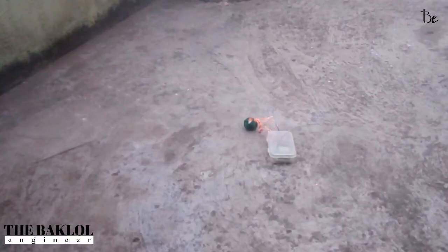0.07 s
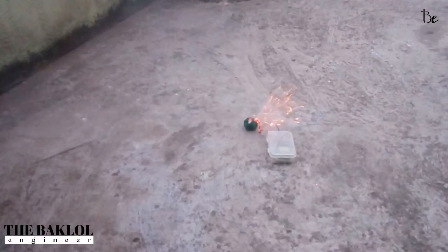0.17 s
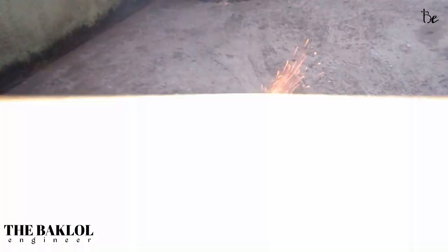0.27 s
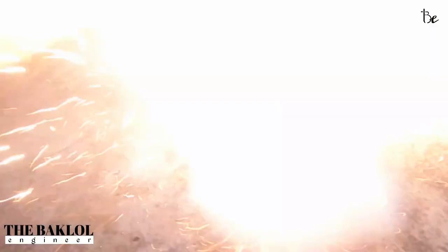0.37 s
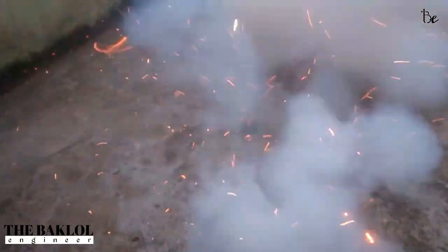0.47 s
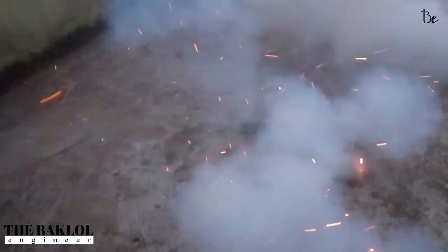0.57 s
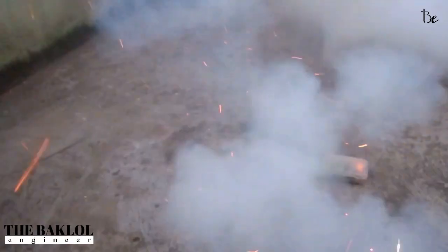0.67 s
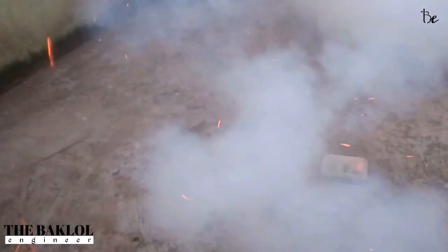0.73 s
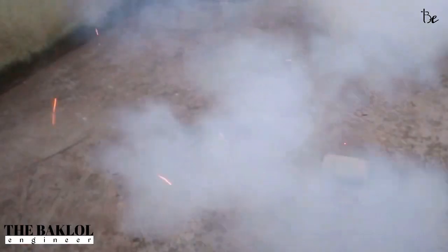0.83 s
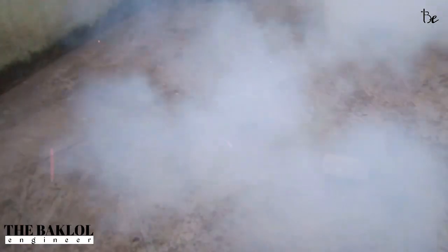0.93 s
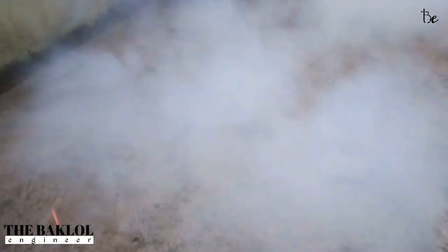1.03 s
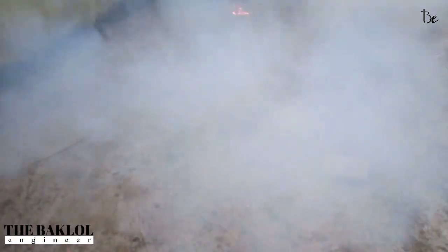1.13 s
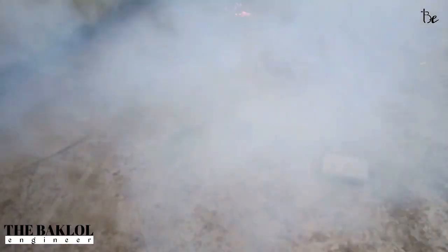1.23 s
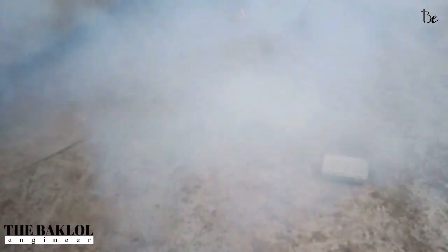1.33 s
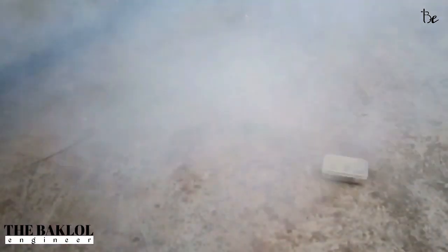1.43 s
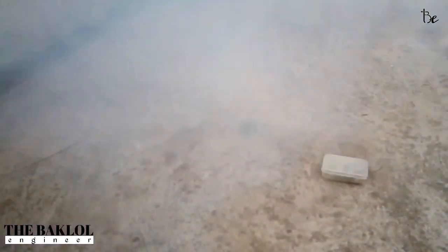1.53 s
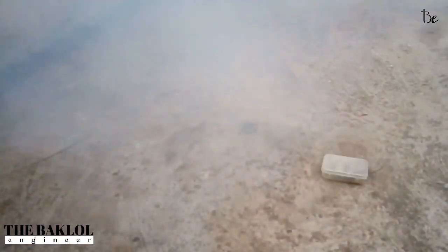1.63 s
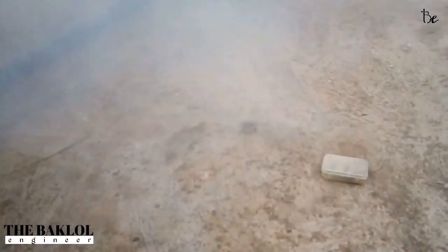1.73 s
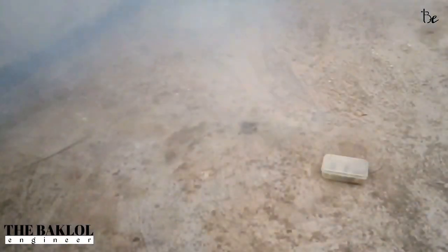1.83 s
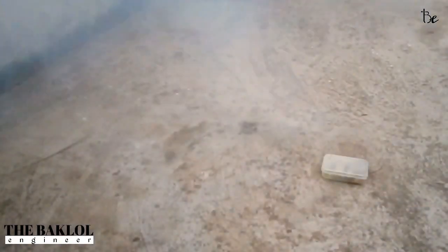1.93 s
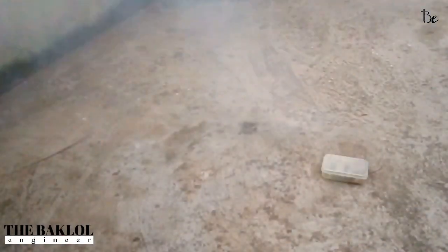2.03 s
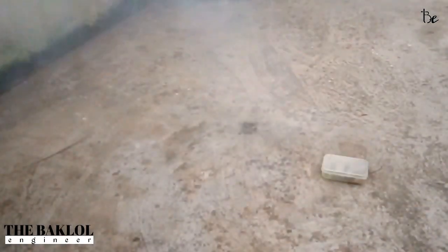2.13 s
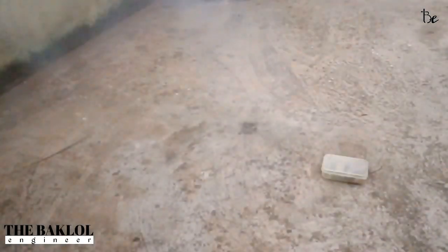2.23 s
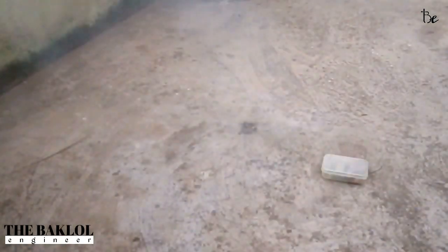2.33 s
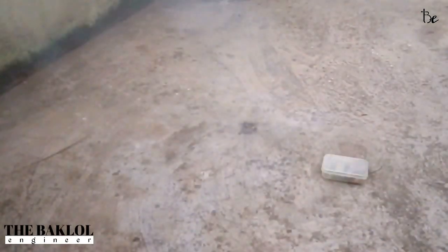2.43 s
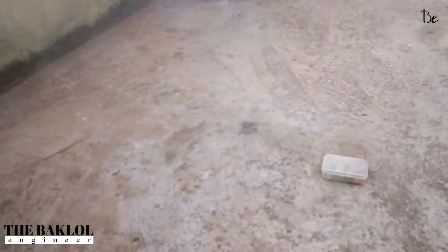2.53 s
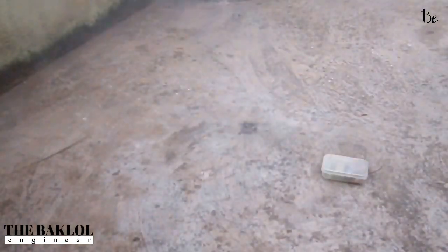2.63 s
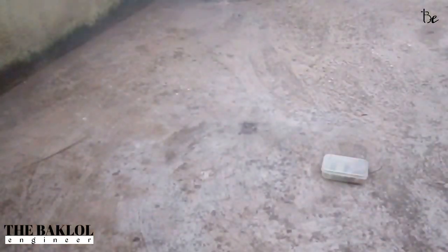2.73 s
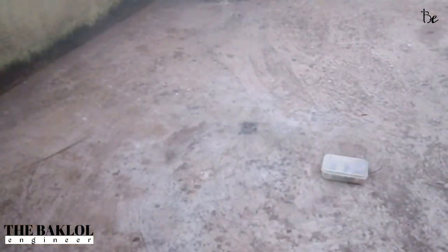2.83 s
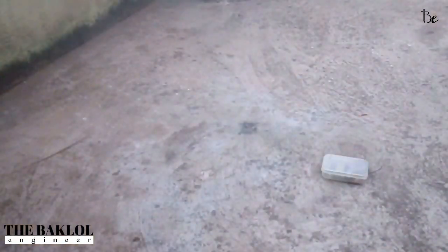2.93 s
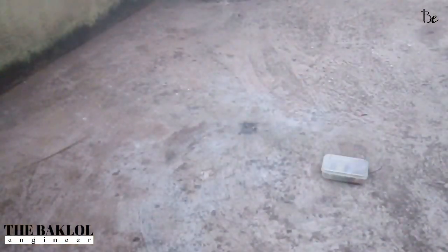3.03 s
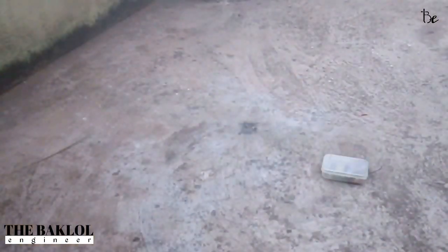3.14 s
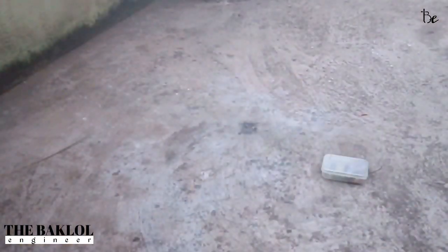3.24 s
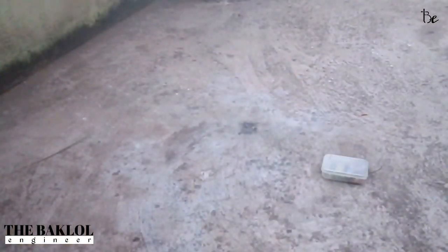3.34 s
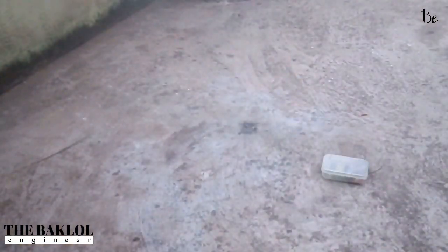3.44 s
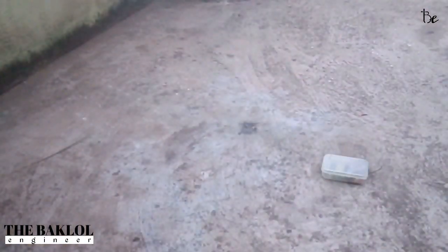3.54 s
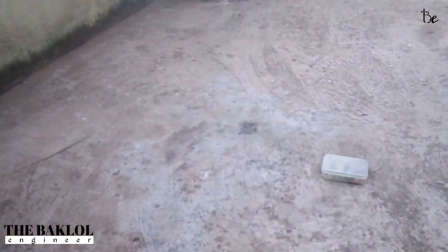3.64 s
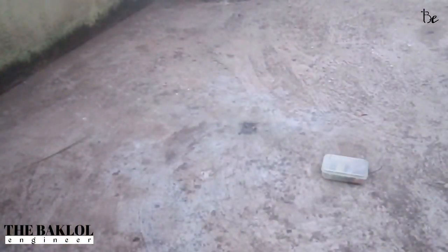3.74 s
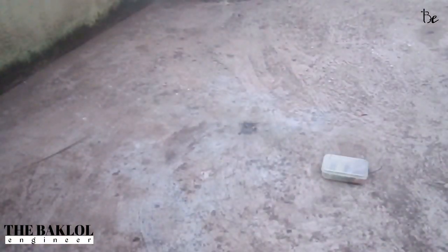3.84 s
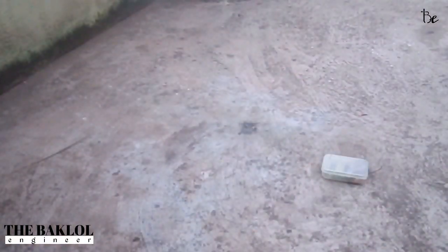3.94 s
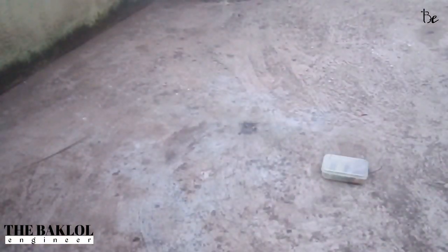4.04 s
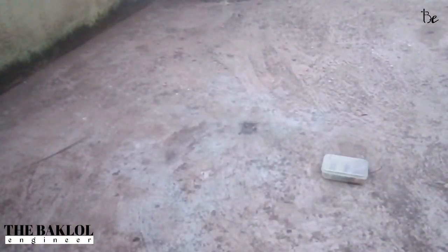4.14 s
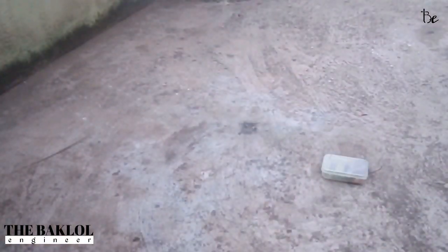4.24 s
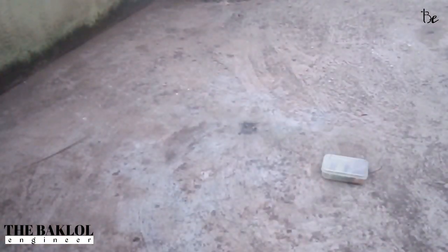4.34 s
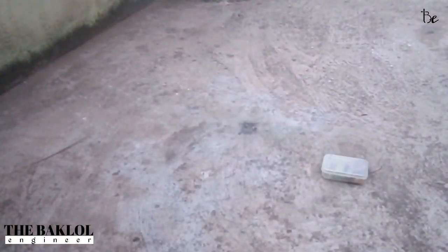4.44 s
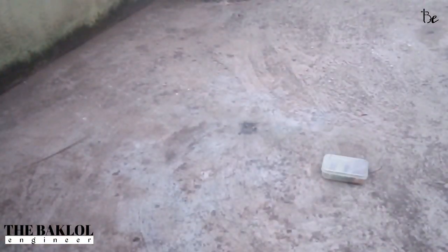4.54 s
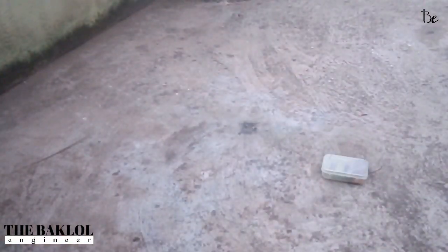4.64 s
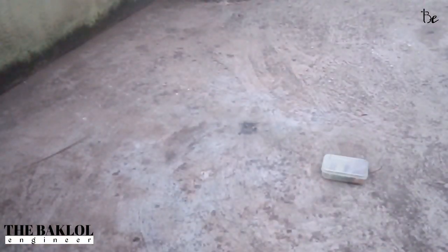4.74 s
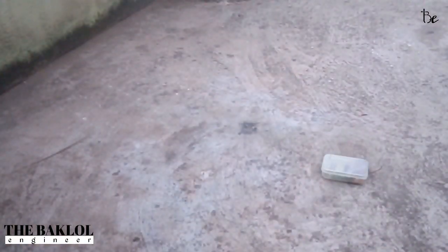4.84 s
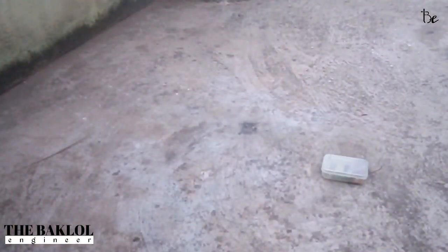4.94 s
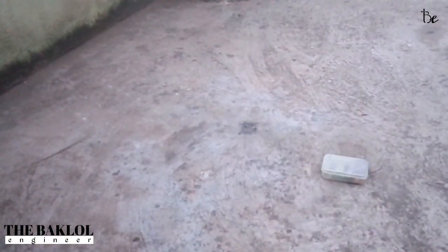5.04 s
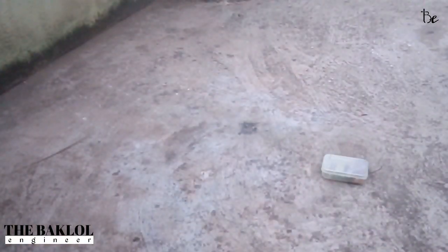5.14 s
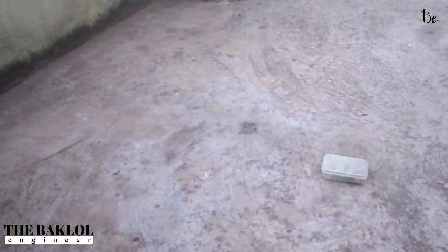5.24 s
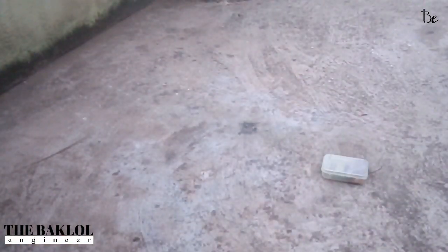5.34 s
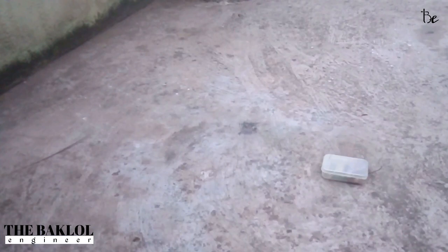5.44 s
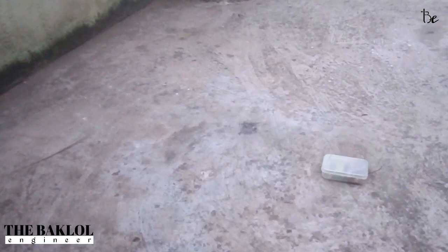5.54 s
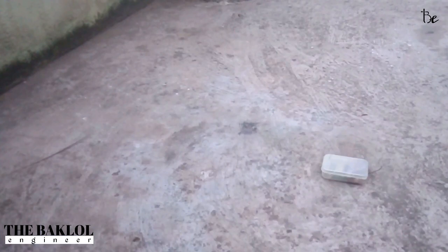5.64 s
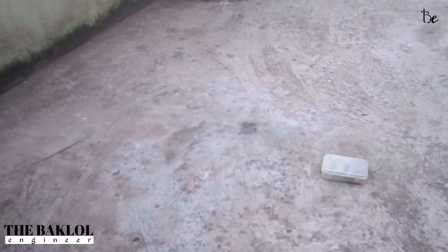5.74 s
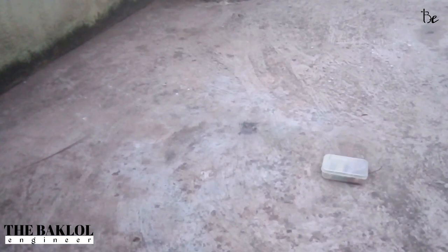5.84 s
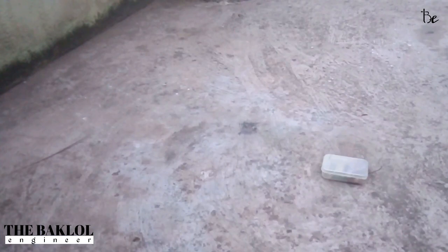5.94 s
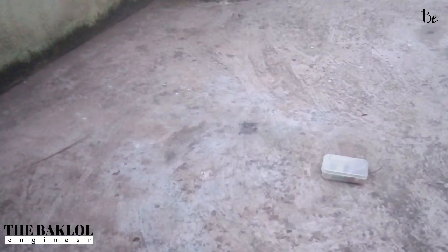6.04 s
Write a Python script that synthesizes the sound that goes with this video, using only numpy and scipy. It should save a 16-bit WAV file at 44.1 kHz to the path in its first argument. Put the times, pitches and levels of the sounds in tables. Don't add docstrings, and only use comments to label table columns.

```python
import sys
import numpy as np
from scipy import signal
from scipy.fft import rfft, irfft, next_fast_len
from scipy.io import wavfile
from scipy.ndimage import uniform_filter1d

SR = 44100
rng = np.random.default_rng(int(sys.argv[2]) if len(sys.argv) > 2 else 0)


def persist_wave(psi):
    counts = np.round(np.clip(psi, -1, 1) * 32767).astype(np.int16)
    wavfile.write(sys.argv[1], SR, np.atleast_2d(counts).T)


def invert_db(x):
    u = np.asarray(x, float) / 20
    return 10 ** u


N = 268745
t = np.arange(N) / SR
BANG_S = .3256


def noise():
    return rng.standard_normal(N)


def unit(x):
    return x / np.sqrt(np.mean(x ** 2))


def shaped(x, gain):
    n = next_fast_len(len(x))
    hz = np.maximum(np.arange(n // 2 + 1) * SR / n, 1.)
    return irfft(rfft(x, n) * gain(hz), n)[:len(x)]


def coloured(points):
    hz, db = np.transpose(points)
    return unit(shaped(noise(), lambda f: invert_db(np.interp(np.log(f), np.log(hz), db))))


def ring(x, hz, width):
    return signal.lfilter(*signal.iirpeak(hz, hz / width, fs=SR), x)


def ring_twice(x, hz, width):
    return ring(ring(x, hz, width), hz, width)


def walk(rate):
    k = int(SR / rate)
    held = np.repeat(rng.standard_normal(N // k + 1), k)
    return unit(uniform_filter1d(uniform_filter1d(held, k), k)[:N])


def curve(rows):
    return np.interp(t, *np.transpose(rows))


def swell(s, length):
    return np.maximum(np.sin(np.pi * np.clip((t - s) / length, 0, 1) ** 0.74), 0) ** 0.55


def soft_clip(x, top, power):
    return x / (1 + np.abs(x / top) ** power) ** (1 / power)


TAIL_HZ = (80, 280, 950, 3600)
# pitch_hz, level_db, hold_s, fade_db_per_s
NEAR = [(80, -20.5, .5, 40), (280, -8, 0.39, 43.5), (950, -4.5, 0.16, 36), (3600, -9.5, 0.19, 46.5)]
# pitch_hz, level_db, fade_db_per_s
DISTANT = [(80, -56.5, 4.5), (280, -41, 11.5), (950, -43.5, 11.5), (3600, -74, -3.5)]
# centre_s, spread_s, level_db, pitch_hz
CLUSTERS = [(.355, 0.03, -6.5, 5300), (.42, .06, -9.5, 3600), (.39, 0.028, -11, 576),
            (0.451, 0.023, -2.5, 85.4), (0.439, 0.034, -2.5, 900), (0.518, 0.023, -4.5, 255),
            (.56, 0.0074, -11, 867.6), (.69, 0.03, -9, 302), (.63, 0.015, -21, 1230), (.82, 0.06, -15, 300),
            (.9, 0.047, -23, 72.3), (0.979, 0.013, -17.5, 280), (1.1, 0.012, -25, 700),
            (1.091, 0.01, -31.5, 3500), (1.33, 0.059, -30.5, 302), (1.481, 0.026, -29, 381),
            (1.74, .03, -52, 222), (1.92, 0.047, -39.5, 347), (2.03, 0.074, -41, 379),
            (2.21, 0.039, -41, 300), (2.43, 0.1, -45, 231)]


def tail_db(hz):
    distant_s, rise_s, knee_s = 1.674, 0.66, 0.14
    bass_lag_s, bass_lag_db, cluster_octaves = 0.03, -12.5, 0.56

    def at(rows, column):
        return np.interp(np.log(hz), np.log(TAIL_HZ), np.array(rows)[:, column])

    ms = t[::44]
    age = np.maximum(ms - BANG_S, 0)
    late = knee_s * np.logaddexp(0, (age - at(NEAR, 2)) / knee_s)
    lag_db = bass_lag_db * np.exp(-age / bass_lag_s) / (1 + (hz / 1500) ** 2)
    power = invert_db(2 * (at(NEAR, 1) - at(NEAR, 3) * late + lag_db))
    arrival = np.clip(1 + (ms - distant_s) / rise_s, 0, 1) ** 2
    power += invert_db(2 * (at(DISTANT, 1) - at(DISTANT, 2) * (ms - distant_s))) * arrival
    for s, spread, db, centre in CLUSTERS:
        octaves = np.log2(hz / centre)
        power += invert_db(2 * db) * np.exp(-((ms - s) / spread) ** 2 - (octaves / cluster_octaves) ** 2)
    return np.interp(t, ms, 10 * np.log10(power + 1e-14))


# pitch_hz, level_db
YARD_COLOUR = [(30, 4), (50, -1.5), (65, 1.5), (80, -4.5), (140, 2), (280, 2.4), (400, 2), (560, -0.5),
               (800, -1.25), (1900, 1.5), (2800, 0.4), (4500, 1), (7000, 0)]
# pitch_hz, width_hz, level_db against the tail
YARD = [(94, 9.7, -13.5), (228, 12, -11), (265, 15, -6.5), (311, 37, -10.5), (149, 8, -23.5),
        (554.5, 6, -17.5), (888, 20, -22.5), (1360, 22, -21.5), (7330, 30, -39.5), (207.5, 8, -16.5),
        (413.4, 21, -12.5), (672, 10, -21), (738, 12, -21), (65, 10, -19)]


def blast():
    excess_db, excess_s = 9.5, 0.14
    since = np.maximum(t - BANG_S, 0)
    colour_hz, colour_db = np.transpose(YARD_COLOUR)
    out, flutter = np.zeros(N), walk(25)
    for hz in 28 * 2 ** np.arange(0, 8.1, 1 / 3):
        db = tail_db(hz) - 6.2 * max(np.log2(60 / hz), 0) - 22 * since * max(np.log2(hz / 3600), 0)
        db = db + np.interp(np.log(hz), np.log(colour_hz), colour_db)
        band = shaped(noise(), lambda f: np.exp(-(np.log2(f / hz) * 3.0) ** 2) / (1 + (f / 6600) ** 16))
        out += unit(band) * invert_db(db - 10.0 + 1.2 * flutter + 1.8 * walk(11))
    hum = sum(unit(ring(noise(), hz, width)) * invert_db(db) for hz, width, db in YARD)
    hum = shaped(hum, lambda f: 1 / (1 + (f / 7700) ** 30))
    out += hum * invert_db(tail_db(TAIL_HZ[1])) * np.clip(since / 0.12, 0, 1)
    out *= invert_db(excess_db * np.exp(-since / excess_s)) * np.minimum(since / 0.005, 1) ** 2
    front = 9 * np.sin(2 * np.pi * (400 + 16000 * since) * since)
    return out - front * np.minimum(since / 0.0012, 1) ** 3 * np.exp(-since / 0.0032)


# start_s, peak_db, pitch_hz, length_s
SLAPS = [
    (.879, -11, 400, .012),
    (1.082, -17, 700, .012),
    (1.324, -25, 400, .012),
    (1.457, -17.5, 340, .016),
    (1.712, -27, 200, .02),
]


def slaps():
    out = np.zeros(N)
    u = t[:4096]
    for s, db, hz, length in SLAPS:
        burst = ring_twice(rng.standard_normal(len(u)), hz, 1.1 * hz)
        burst = burst * np.exp(-u / length) * np.minimum(u / 0.009, 1) ** 2
        start = int(s * SR)
        out[start:start + len(u)] += burst / np.abs(burst).max() * invert_db(db)
    return shaped(out, lambda f: 1 / (1 + (f / 1600) ** 4))


GATE_HZ = (178.7, 464, 296.6)
GATE_RISE_S = (.035, 0.044, .035)
# start_s, level_db
GATE_PUSHES = [
    [(.46, -22), (.61, -8.5), (.82, -11.5), (1.07, -24), (1.31, -35), (1.45, -42.5), (1.7, -34),
     (1.85, -34), (2.15, -46.5), (2.4, -38)],
    [(.46, -24), (.65, -30.5), (.76, -18.5), (.86, -25.5), (1.03, -25.5), (1.12, -29.5), (1.22, -34.5),
     (1.39, -31), (1.53, -37.5), (1.72, -49), (1.87, -39.5), (2.15, -55), (2.3, -53.5), (2.58, -54),
     (2.76, -57)],
    [(.54, -11.5), (.6, -15), (.66, -10.5), (.73, -18.5), (.81, -18), (.96, -27), (1.23, -30), (1.31, -34),
     (1.9, -41), (2.2, -44.5)],
]


def gate():
    out = 0
    for hz, rise, pushes in zip(GATE_HZ, GATE_RISE_S, GATE_PUSHES):
        tone = np.sin(2 * np.pi * np.cumsum(hz * (1 + .004 * walk(6.4))) / SR)
        ages = [(np.maximum(t - s, 0) / rise, db) for s, db in pushes]
        level = np.sqrt(sum((invert_db(db) * u * np.exp(1 - u)) ** 2 for u, db in ages))
        out = out + np.sqrt(2) * tone * level * invert_db(-2 + 2.0 * walk(25))
    return out


# pitch_hz, start_s, rise_s, level_db
RAILING = [(565, .88, .1, -32), (565, 1.12, .07, -38), (931, .76, .07, -33), (1170, .8, .07, -33),
           (1410, .78, .06, -29), (1410, .95, .07, -38), (2036, .7, .05, -30), (1790, .72, .06, -31),
           (462, 1.8, .1, -52), (462, 2.2, .1, -52), (255, 2.3, .12, -47)]


def railing():
    out = 0
    for hz, s, rise, db in RAILING:
        u = np.maximum(t - s, 0) / rise
        out = out + invert_db(db) * u * np.exp(1 - u) * unit(ring_twice(noise(), hz, 18))
    return out


# start_s, level_db
FUSE = [
    (0, -68.5),
    (.06, -62.5),
    (.12, -54),
    (.17, -47),
    (.22, -44.5),
    (.3, -41.5),
]
# pitch_hz, level_db per Hz
FUSE_COLOUR = [(150, -35), (300, -5.5), (900, -5.5), (3000, -2), (6500, -2.5), (8000, 0.5), (12000, -5.5),
               (15500, -12)]


def fuse():
    dull_db_per_s, flare_s = 200, .185
    hiss = coloured(FUSE_COLOUR)
    top = shaped(hiss, lambda f: 1 / (1 + (7000 / f) ** 12))
    hiss = hiss + top * (invert_db(-dull_db_per_s * np.maximum(flare_s - t, 0)) - 1)
    level_db = np.where(t <= BANG_S, curve(FUSE), -140)
    return hiss * invert_db(level_db + 5.0 + .7 * walk(150))


# start_s, length_s, level_db
FIZZ = [
    (.44, .3, -35),
    (.72, 0.21, -45),
    (1.089, 0.064, -53),
    (1.265, .07, -64),
]
# pitch_hz, level_db per Hz
FIZZ_COLOUR = [(6000, -29.5), (7600, 0), (9000, -1), (10500, -9), (15000, -16.5)]


def fizz():
    level = sum(invert_db(db) * swell(s, length) ** 2 for s, length, db in FIZZ)
    return coloured(FIZZ_COLOUR) * invert_db(2.5 * walk(40)) * level


# start_s, peak_db, pitch_hz, t60_s
SNAPS = [(3.7056, -29, 4500, .002), (3.7165, -10.5, 3300, .0014), (3.7166, -18, 9000, .0012),
         (3.7230, -23, 3800, .0016), (4.8937, -26, 5500, .002), (4.8815, -33, 3500, .003),
         (4.9030, -30, 4800, .003), (4.9092, -25, 2200, .004), (4.9103, -17, 2400, .0035),
         (4.9148, -28, 2300, .005), (4.9173, -25, 2600, .004), (4.9205, -29, 2400, .005),
         (5.3397, -27, 5200, .002), (5.3463, -31, 4600, .002), (5.3469, -30, 2300, .004),
         (5.3484, -31, 2800, .003), (5.3497, -32, 4500, .002)]
# start_s, peak_db
TICKS = [(1.9094, -35), (2.0084, -37), (2.2714, -35), (2.8504, -36), (3.7294, -32), (3.7434, -33),
         (3.7963, -32), (3.9244, -36), (4.0774, -39), (4.9214, -33), (5.0768, -37), (5.3263, -37),
         (5.3574, -37), (5.2555, -45), (5.3354, -33), (5.3524, -31), (5.3989, -39), (5.5498, -42)]
# start_s, length_s, level_db, pitch_hz
RUSTLES = [(2.269, .16, -51.5, 3300), (5.39, 0.048, -51, 5700), (2.63, .1, -61, 2100),
           (2.374, .03, -49, 6700), (3.5, .06, -47.5, 6450), (3.717, 0.084, -43.5, 3000),
           (3.76, .04, -49, 6500), (3.796, .07, -47, 5600), (3.848, 0.031, -49, 7000),
           (4.878, 0.018, -38.5, 4500), (4.888, 0.047, -33.5, 5400), (4.1, .012, -41, 5300),
           (4.91, .022, -32, 2400), (5.073, 0.024, -44, 3800), (5.084, .05, -49, 6300),
           (3.6, 0.0205, -53.5, 4300), (4.439, 0.041, -55, 6500), (3.93, 0.046, -52.5, 5700),
           (1.8, .04, -48, 4200), (5.325, .02, -45, 4500), (5.335, 0.02, -40.5, 5000),
           (5.349, 0.033, -46, 3200)]


def scraps():
    tick_hz, tick_t60_s = 4500, .002
    out = np.zeros(N)
    u = t[:1024]
    for s, db, hz, t60 in [*SNAPS, *((*row, tick_hz, tick_t60_s) for row in TICKS)]:
        tick = np.sin(2 * np.pi * hz * u) * np.exp(-np.log(1000) * u / t60)
        tick += 0.071 * ring(rng.standard_normal(len(u)), hz, hz) * np.exp(-u / 0.0074)
        start = int(s * SR)
        out[start:start + len(u)] += invert_db(db) * tick / np.abs(tick).max()
    for s, length, db, hz in RUSTLES:
        creases = noise() * invert_db(2.4 * walk(900))
        creases = unit(ring(ring(creases, hz, 0.88 * hz), hz, 0.87 * hz))
        age = np.maximum(t - s, 0)
        out += invert_db(db) * np.minimum(age / 0.0026, 1) * np.exp(-2.2 * age / length) * creases
    return shaped(out, lambda f: 1 / (1 + (1500 / f) ** 8) / (1 + (f / 10500) ** 8))


LOW_NOTES = [(2.165, .055, 1400, 1380, -54), (2.42, .06, 1420, 1380, -54), (2.63, .09, 1460, 1380, -48),
             (2.925, .095, 1490, 1400, -47), (3.325, .05, 1560, 1540, -45), (3.39, .025, 1540, 1530, -51),
             (3.715, .04, 1470, 1460, -51), (3.995, .035, 1560, 1540, -49), (2.49, .04, 1540, 1500, -53),
             (2.8, .04, 1680, 1650, -53), (3.095, .04, 1760, 1720, -53)]
ARCHES = [(2.228, .078, 1710, 1350, -50), (2.52, .1, 1820, 1300, -51), (2.83, .09, 1910, 1450, -52),
          (3.125, .1, 1960, 1350, -53.5), (3.455, .08, 1790, 1330, -54), (3.625, .095, 1600, 1320, -45.5),
          (3.932, .068, 1550, 1410, -44.5), (4.01, .115, 2010, 1400, -53), (5.8, .14, 1540, 1080, -63)]
SLIDES = [(2.105, .06, 1390, 1240, -50), (2.33, .055, 1390, 1290, -47), (2.43, .07, 1700, 1500, -52),
          (2.72, .045, 1450, 1340, -47), (2.74, .07, 1810, 1590, -52), (3.025, .04, 1500, 1400, -46),
          (3.045, .06, 1920, 1780, -55), (3.39, .065, 1790, 1700, -53), (3.74, .08, 1960, 1650, -55)]
PIPING = [(1.57, .098, 2290, 2250, -55), (1.885, .025, 2700, 2650, -55), (3.29, .14, 2600, 2540, -59),
          (3.53, .09, 2200, 2130, -55), (3.54, .13, 2620, 2530, -57), (3.795, .12, 2630, 2570, -54),
          (4.045, .091, 2700, 2590, -54), (4.3, .08, 2730, 2560, -56), (4.575, .14, 2773, 2700, -56),
          (4.89, .13, 2770, 2680, -57), (5.53, .2, 1990, 2050, -66), (5.91, .12, 1970, 1990, -64)]
# start_s, length_s, level_db, pitch_hz
FLOCK = [(1.95, 0.17, -58, 1150), (3.034, 0.16, -56, 2060), (3.3, 0.23, -57, 2150), (3.53, 0.2, -57, 2350),
         (4.7, 0.29, -65, 2400), (4.1, 0.6, -68, 1544), (5.05, .8, -66, 1520), (3.3, .3, -62, 2550),
         (3.85, .5, -63, 2600), (4.72, .45, -65, 2740)]
# delay_s, level_db
CALL_ECHO = (.062, -12.5)


def birds():
    fall_power, edge_s = 1.5, .01
    kinds = [(LOW_NOTES, .11, .65, 2, 0), (ARCHES, .16, .42, 2, -1.5),
             (SLIDES, .02, .2, 3, 0), (PIPING, .03, .2, 7, 0)]
    out = np.zeros(N)
    husk, waver_hz = invert_db(2.2 * walk(110) - .3), 28 * walk(120)
    for notes, scoop, place, fade_db, kind_db in kinds:
        for s, length, top, end, db in notes:
            span = slice(int(s * SR), int((s + length) * SR))
            u = (t[span] - s) / length
            climb = scoop * top * (1 - u / place) ** 2
            fall = (top - end) * np.abs((u - place) / (1 - place)) ** fall_power
            pitch = top - np.where(u < place, climb, fall) + waver_hz[span]
            edge = np.clip(np.minimum(u, 1 - u) * length / edge_s, 0, 1)
            level = np.sqrt(2) * invert_db(db - fade_db * (u - place) + kind_db)
            out[span] += level * edge * np.sin(2 * np.pi * np.cumsum(pitch) / SR)
    out *= husk
    delay_s, echo_db = CALL_ECHO
    out += invert_db(echo_db) * np.roll(out, int(delay_s * SR))
    for s, length, db, hz in FLOCK:
        out += invert_db(db) * swell(s, length) * unit(ring_twice(noise(), hz, 0.14 * hz))
    blur = rng.standard_normal(SR // 2) * np.exp(-np.log(1000) * t[:SR // 2] / .5)
    return out * invert_db(-.5) + invert_db(-3) * signal.fftconvolve(out, blur / np.linalg.norm(blur))[:N]


# pitch_hz, pulses_per_s, level_db against the nearest
TRILLS = [(4780, 88.25, -0.5), (5160, 120, -8), (5400, 84, -8), (4330, 93, -13.5), (5770, 105, -10.5)]
# start_s, level_db
CRICKET = [(0, -57), (1.3, -57), (1.75, -57.5), (1.85, -61), (2.2, -58), (2.3, -55), (3.4, -56.5),
           (3.5, -65.5), (3.6, -55), (4.2, -54.5), (4.32, -64.5), (4.42, -62), (4.5, -53.5), (4.9, -61),
           (5.0, -62), (5.4, -54), (5.7, -62.5), (6.09, -60)]
# chirp_onset_s (any one chirp start; others fall a period apart before
# and after), period_s, length_share, pitch_hz, level_db
CHIRPER = (1.5, 0.5, 0.7, 5802, -66)
# pitch_hz, level_db per Hz
CHORUS = [(3000, -36), (4100, -19), (4500, -1.5), (5000, 2.5), (5900, -4.5), (6500, -14), (7600, -25),
          (9000, -41)]


def insects():
    far_db = -58.5
    trills = 0
    for k, (hz, rate, db) in enumerate(TRILLS):
        stroke = np.cumsum(rate * (1 + .0007 * walk(3))) / SR % 1
        note = np.sin(2 * np.pi * hz * stroke / rate) * np.sin(np.pi * stroke ** .8) ** 1.6
        bouts_db = far_db + 3.2 * walk(2.5) if k else curve(CRICKET)
        trills = trills + invert_db(db + bouts_db + 2.0 * walk(25)) * unit(note)
    start, period, share, hz, chirp_db = CHIRPER
    beat = uniform_filter1d(1. * ((t - start) / period % 1 < share), size=600)
    chirps = beat * invert_db(chirp_db + 2.5 * walk(1.4)) * unit(ring(noise(), hz, 30))
    return trills + chirps + coloured(CHORUS) * invert_db(-54.5 + 0.87 * walk(11))


# pitch_hz, level_db per Hz
AIR = [(18, -48), (30, -14.5), (130, 4), (201, -1), (393, -9.5), (508, -18.5), (806, -16), (1490, -13),
       (1740, -17.5), (2700, -16.5), (3320, -19), (4880, 2.5), (5840, -18), (7750, -44), (14000, -55.5)]
# start_s, level_db against the mean
TRAFFIC = [(0, -4.5), (.3, 0.5), (2.6, 1), (2.9, 2.5), (3.2, -0.5), (3.5, 4), (3.8, 2), (4.1, 1.5),
           (4.4, 1), (4.7, -1), (5.0, 1.5), (5.2, 1), (5.36, 3.5), (5.45, 0), (5.62, -3), (5.8, 1),
           (5.95, 1), (6.09, -1)]
# start_s, level_db
WIND = [(0, -61.5), (.3, -59), (1.9, -63), (2.2, -65), (2.6, -63), (2.95, -59.5), (3.25, -60),
        (3.45, -62.5), (3.75, -57.5), (3.95, -59.5), (4.1, -59.5), (4.6, -61), (4.9, -60.5), (5.2, -67),
        (5.38, -63.5), (5.7, -66), (5.92, -63.5), (6.09, -65.5)]


def air():
    rumble_db, sag_db_per_s = -58.5, 0.94
    calm_db, leaf_share, leaf_hz = -59, 0.89, 1890
    sound = coloured(AIR)
    low = shaped(sound, lambda f: 1 / (1 + (f / 480) ** 8))
    high = shaped(sound, lambda f: 1 / (1 + (3700 / f) ** 12))
    rumble = unit(low) * invert_db(rumble_db - sag_db_per_s * t + 7.0 + curve(TRAFFIC) + 1.0 * walk(9))
    gust_db, middle = curve(WIND), unit(sound - low - high)
    leaves = shaped(middle, lambda f: 1 / (1 + (leaf_hz / f) ** 8))
    middle = middle + leaves * (invert_db(leaf_share * (gust_db - calm_db)) - 1)
    return rumble + middle * invert_db(gust_db + 5.5 + 1.3 * walk(6))


def scene():
    explosion = blast() + slaps() + gate() + railing() + fuse() + fizz()
    return (explosion + scraps() + birds() + insects() + air())[None]


def top_cut(x):
    return signal.sosfilt(signal.butter(12, 15590, fs=SR, output="sos"), x)


def record(dry):
    hiss_db = -79.5
    x = shaped(dry[0], lambda f: np.maximum(1 / np.sqrt(1 + (f / 6800) ** 24), invert_db(-18.0)))
    step_age = np.clip(t - .3141, 0, 1)
    step = .13 * np.sin(np.pi / 2 * np.minimum(step_age / .0012, 1)) ** 2 * np.exp(-step_age / .009)
    step *= 1 + 0.27 * np.sin(2 * np.pi * 6700 * step_age)
    x = np.where(t < BANG_S, x * np.exp(-step_age / 0.0032), x)
    x = soft_clip(x, top=1.02, power=15)
    x = signal.lfilter(*signal.butter(1, 45, "high", fs=SR), x)
    x = x + step + invert_db(hiss_db) * shaped(noise(), lambda f: 1 / (1 + (f / 12000) ** 4))
    return top_cut(soft_clip(x, top=.995, power=24)[None])


dry = scene()
out = record(dry)
persist_wave(out)
```